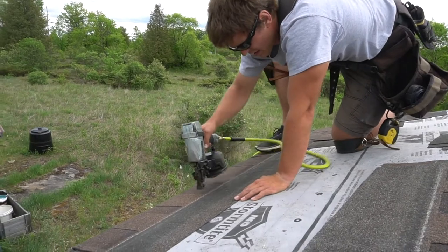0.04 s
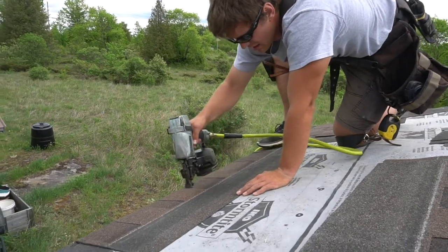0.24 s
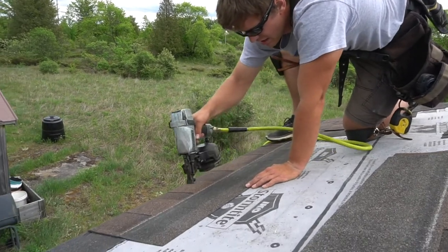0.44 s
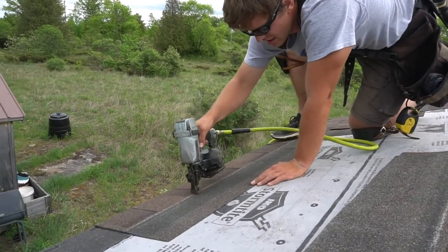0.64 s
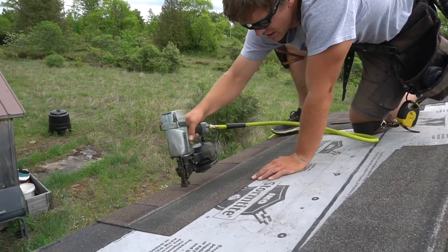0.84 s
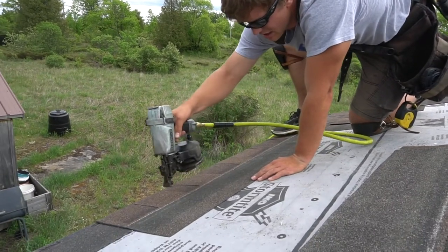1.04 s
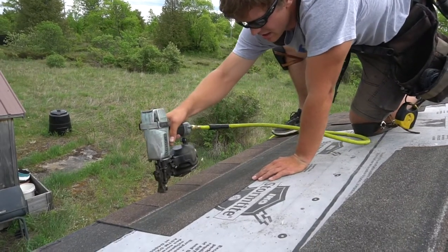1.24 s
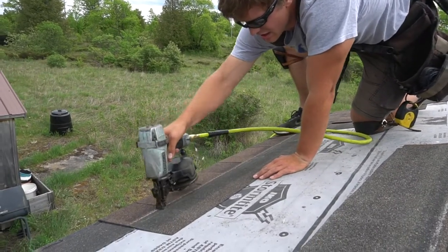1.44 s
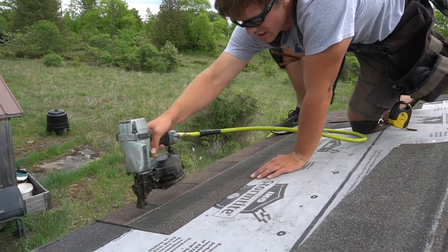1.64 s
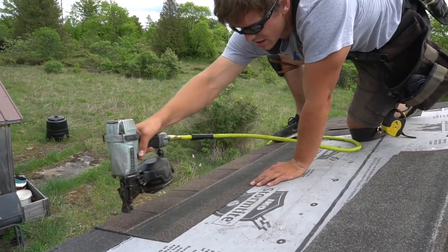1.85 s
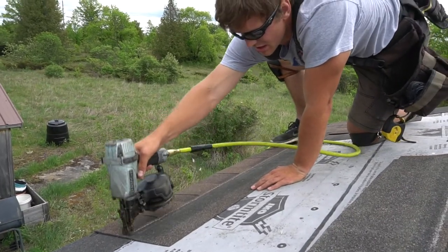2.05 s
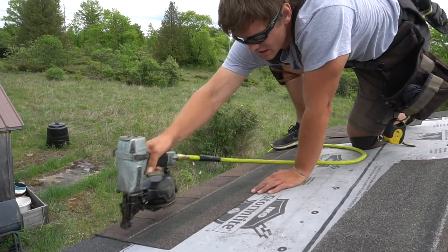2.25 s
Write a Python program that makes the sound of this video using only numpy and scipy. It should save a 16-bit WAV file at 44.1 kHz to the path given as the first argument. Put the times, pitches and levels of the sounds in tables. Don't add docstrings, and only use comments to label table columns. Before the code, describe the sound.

Pneumatic nail gun fires three loud, clipped shots on a windy roof, each venting whistling air

```python
import sys
import numpy as np
from scipy import signal
from scipy.fft import rfft, irfft
from scipy.io import wavfile
from scipy.ndimage import uniform_filter1d

SR = 44100
rng = np.random.default_rng(int(sys.argv[2]) if len(sys.argv) > 2 else 0)


def to_wav(sig):
    pcm = np.clip(np.atleast_2d(sig), -1, 1) * 32767
    pcm = np.round(pcm).astype(np.int16)
    wavfile.write(sys.argv[1], SR, pcm.T)


def nominal_scale(level):
    x = np.asarray(level, float) / 20
    return 10 ** x


N = 101297
LEAD_S = 0.25

# nose touch, driver clank, nail blow and piston return, all in seconds.
SHOT_TIMES = [
    (.7276, .7474, .7545, .7803),
    (1.5049, 1.5246, 1.5318, 1.5614),
    (2.1230, 2.1412, 2.1482, 2.1734),
]
EARLIER_RETURN_S, EARLIER_DB = -.028, 1

TOUCH_DB = [-11, -9, -18]
TOUCH_T60_S, TOUCH_HZ = 0.003, 1000
LUMP_DB, LUMP_HZ = -19, 500

# start in seconds, length in seconds, level in dB, whistle in Hz.
VALVE_SPURTS = [(.7315, .013, -19, 8600), (.7345, .004, -22, 13500), (1.5095, .0062, -19, 8300),
                (1.519, .005, -15, 8200), (2.1262, .004, -28, 8600), (2.1305, .003, -14, 13200),
                (2.133, .007, -21, 8600)]
# centre in seconds, level in dB, speed in Hz signed by direction.
PRESSURE_SURGES = [(.7327, -7, -220), (.7375, -11, 120), (.7435, -10, -250), (.7455, -10, 250),
                   (.7468, -8, -350), (1.5145, -13, -250), (1.516, -10, 400), (1.5238, -8, -450),
                   (2.1288, -14, -300), (2.1333, -9, -400), (2.136, -9, 90), (2.1403, -9, -220),
                   (2.157, 4, -350), (1.5385, 4, -450)]
# frequency in Hz, level in dB.
VALVE_AIR = [(200, 1.5), (1200, 0.5), (3000, 2), (6000, 5), (8700, -5.5), (10500, -1.5), (16000, 0.5)]
REED_HZ, REED_DB = 8550, -3

# frequency in Hz, level in dB, 60 dB decay in seconds.
CLANK_MODES = [(8500, -3, .007), (3100, -6, .006), (6600, -8, .006), (1800, -8, .006)]
CLANK_DB, CLANK_CRACK_DB = 7.5, -0.5
DRIVER_DB = [-18, -6, -3]
DRIVER_HZ, DRIVER_T60_S = 5050, .013

# frequency in Hz, level in dB, 60 dB decay in seconds.
BLOW_MODES = [(1500, 11.5, 0.013), (2200, 6, .012), (3550, 4, 0.0095)]
BLOW_PITCH = [.7, 0.97, 0.93]
BLOW_LAG_S, SQUEAK_DB = .0017, -9
BLOW_CRACK_DB, BLOW_CRACK_T60_S = 6, 0.031
PUSH_DB = [1.5, 1, 2.5]
PUSH_S = 0.01
# frequency in Hz, level in dB.
RATTLE_COLOUR = [(200, 4), (1200, -3.5), (3000, -4.5), (6000, -2), (8700, -3.5), (11000, -15), (16000, -12)]
RATTLE_DB, RATTLE_T60_S = -7, 0.091
# frequency in Hz, level in dB, 60 dB decay in seconds.
BOARD_MODES = [(824, 14.5, 0.02), (1513, 10.5, 0.015), (1502, 9.5, 0.015)]
# frequency in Hz, level in dB, 60 dB decay in seconds.
THUD_MODES = [(301.5, 0, 0.028), (94, -28, 0.092)]
THUD_DB = [10, 1.5, -3.5]
# frequency in Hz, level in dB, 60 dB decay in seconds.
DECK_MODES = [(71.5, -21.5, 0.72), (109, -20, 0.24), (188, -7, 0.21), (246, -28, .2), (343, -27, 0.099)]

SUCK_DB, SUCK_S = -2, 0.00131
HEAVE_DB = [-14, -14, -5]
HEAVE_S = .007
PUFF_DB, PUFF_S, PUFF_TAIL_DB, PUFF_T60_S = -14, .0172, -13, 0.28
STOP_DB, PAWL_S, PAWL_DB = -15, .0225, -11

# time after the piston return in seconds, level in dB.
VENT_CURVE = [(.015, -39), (.03, -27.5), (.05, -18), (.075, -16), (.11, -21), (.135, -26.5), (.175, -40),
              (.22, -50), (.4, -69)]
VENT_DB = [-0.5, 1, -1]
# frequency in Hz, level in dB.
JET_COLOUR = [(100, 7), (400, -1.5), (1200, -7.5), (2800, -14), (4870, -10), (8460, -13.5), (13000, -57),
              (16000, -46)]
# frequency in Hz, width in Hz, level in dB, share of pitch lost as pressure sags.
PORT_WHISTLES = [(4914, 380, -7.5, 0.22), (8490, 840, -8.5, 0.019), (4210, 340, -11.5, 0.16),
                 (12300, 1400, -15, 0.025), (13200, 700, -25, .01)]
ROAR_DB, ROAR_HZ, FLUTTER_DB = -11.5, 350, 1
DULLING_DB, DULL_HZ = -10.5, 6540

YARD_DB, YARD_T60_S, YARD_HZ = -22, 0.69, 1940

# time in seconds, level in dB.
SCUFF_CURVE = [(.07, -43), (.12, -28), (.165, -31), (.19, -26), (.21, -34), (.235, -28.5), (.258, -38),
               (.27, -44), (.33, -55)]
# start in seconds, level in dB, frequency in Hz.
DECK_KNOCKS = [
    (.159, -16, 253),
    (0.196, -17.5, 314),
    (0.24, -20.5, 295),
    (1.182, -27, 202),
]
# start in seconds, level in dB, frequency in Hz.
GRIT_TICKS = [(0.3965, -50, 7000), (0.517, -39, 7400), (0.537, -49.5, 2200), (.656, -42, 1640),
              (1.05, -33, 7900), (1.204, -39, 3700), (1.221, -45, 2400), (1.236, -42, 4000),
              (1.2433, -27.5, 2460), (1.253, -31, 2470), (1.2733, -29, 2470), (1.278, -37, 2400),
              (1.282, -35, 6000), (1.2825, -36, 2400), (1.2848, -22, 2470), (1.297, -43, 2400),
              (1.316, -39.5, 885), (1.491, -45, 1780), (1.75, -36, 6900), (1.768, -31, 7560),
              (1.8652, -37, 4150), (1.934, -42, 4930), (1.955, -43, 5500), (1.978, -29.5, 1980),
              (1.9783, -37.5, 1210), (1.9785, -31.5, 2470), (2.009, -34.5, 8250), (2.074, -38.5, 2040),
              (2.244, -12.5, 2380), (2.279, -11, 2500)]
TICK_CYCLES, TICK_SNAP = 19, 0.5
GRIT_PER_S, GRIT_DB = 120, -62
# time in seconds, level in dB.
RUSTLE_CURVE = [(0, -12), (.3, 5.5), (.7, 5), (1.0, 10), (1.25, 8), (1.4, 2), (1.8, 8.5), (2.1, 5.5),
                (2.3, 12)]

# frequency in Hz, level in dB.
AIR_COLOUR = [(60, 2), (110, -8.5), (220, -19), (1400, -24), (3000, -32), (9000, -37), (10200, -48),
              (16000, -46.5)]
AIR_DB = -47.5
# frequency in Hz, level in dB.
MOTOR_HUM = [(685, -56.5), (550, -68)]
HUM_FADE_DB_PER_S = -4
# time in seconds, level in dB.
WIND_CURVE = [(0, -39), (.08, -39), (.3, -35), (.7, -40), (.95, -30), (1.13, -30), (1.19, -22), (1.33, -23),
              (1.45, -28), (1.7, -36), (2.05, -33), (2.2, -24), (2.3, -27)]
# frequency in Hz, level in dB.
WIND_COLOUR = [(8, -5), (22, 2.5), (45, -4), (80, -9.5), (160, -23), (300, -39.5), (1000, -70)]
WIND_DB = -2
# centre in seconds, level in dB, speed in Hz signed by direction.
WIND_BUFFETS = [(1.048, -12, 14), (1.087, -16, -12), (1.173, -13, 30), (1.183, -13, -35), (1.24, -15, -16),
                (1.27, -8, -18), (1.309, -.3, 17), (1.342, -7, -11), (1.44, -10, 13), (1.472, -10, -14)]

RAIL, KNEE, COUPLING_HZ = 0.84, 4.5, 31
SQUEEZE, SQUEEZE_S = 1.26, 0.0045
PORT_RAIL, TOP, EDGE_HZ = .8, .97, 15900


def evened(x):
    return x / np.sqrt(np.mean(x ** 2) + 1e-20)


def add(mix, s, sound):
    at = round(s * SR)
    sound = sound[max(-at, 0):]
    part = mix[max(at, 0):][:len(sound)]
    part += sound[:len(part)]


def clock(length):
    return np.arange(round(length * SR)) / SR


def fade(db, t, t60):
    return nominal_scale(db - 60 * t / t60)


def noise(size):
    return rng.standard_normal(size)


def wander(size, width):
    return evened(uniform_filter1d(noise(size), size=width))


def coloured(points, size):
    f, level = np.transpose(points)
    hz = np.fft.rfftfreq(size, 1 / SR)
    shape = nominal_scale(np.interp(np.log(hz + 1), np.log(f + 1), level))
    return evened(irfft(rfft(noise(size)) * shape, size))


def resonate(x, hz, width):
    turn = np.exp(2j * np.pi * np.cumsum(hz * np.ones(len(x))) / SR)
    r = np.exp(-np.pi * width / SR)
    return 2 * (turn * signal.lfilter([1 - r], [1, -r], x / turn + 1e-18)).real


def ring(modes, t):
    return sum(fade(db, t, t60) * np.sin(2 * np.pi * hz * rng.uniform(0.96, 1.02) * t)
               for hz, db, t60 in modes)


def rumble(modes, t):
    return sum(fade(db, t, t60) * evened(resonate(noise(len(t)), hz, 5.8)) for hz, db, t60 in modes)


def curve(points, t):
    s, level = np.transpose(points)
    return nominal_scale(np.interp(t, s, level, left=level[0], right=level[-1]))


def gate(t, length, rise=.0012, fall=.001):
    return np.clip(t / rise, 0, 1) * np.clip((length - t) / fall, 0, 1)


def surges(table, t):
    return sum(np.sign(hz) * nominal_scale(db) * np.exp(-(4 * hz * (t - s)) ** 2) for s, db, hz in table)


def railed(x, rail, knee):
    return x / (1 + abs(x / rail) ** knee) ** (1 / knee)


def nail_blow(t, k):
    n = len(t)
    push = nominal_scale(PUSH_DB[k]) * np.minimum(t / 0.0019, 1) * np.exp(-t / PUSH_S)
    rattle = fade(RATTLE_DB, t, RATTLE_T60_S) * coloured(RATTLE_COLOUR, n)
    crack = coloured([(200, 1.5), (1400, 6), (2500, -2.0), (16000, -12.5)], n)
    crack *= fade(BLOW_CRACK_DB, t, BLOW_CRACK_T60_S)
    nail = ring(BLOW_MODES, t * BLOW_PITCH[k])
    thud = nominal_scale(THUD_DB[k]) * ring(THUD_MODES, t)
    board = ring(BOARD_MODES[k:][:1], t)
    deck = rumble(DECK_MODES, t) * np.minimum(t / 0.058, 1)
    return push + nail + thud + board + rattle + crack + deck


def driver_clank(t, k):
    metal = ring(CLANK_MODES + [(DRIVER_HZ, DRIVER_DB[k], DRIVER_T60_S)], t)
    crack = fade(CLANK_CRACK_DB, t, .007) * coloured([(500, -3), (9000, 0), (16000, -9)], len(t))
    return nominal_scale(CLANK_DB) * (metal + crack)


def nose_touch(t, k):
    scrape = 0.38 * coloured([(800, 13), (3000, 15), (16000, -40)], len(t))
    return fade(TOUCH_DB[k], t, TOUCH_T60_S) * (np.cos(2 * np.pi * TOUCH_HZ * t) + scrape)


def stroke(mix, touch, clank, blow, k):
    t = clock(1.0)
    n = len(t)
    add(mix, touch, nose_touch(t, k))
    lumps = evened(resonate(noise(n), LUMP_HZ, 650))
    add(mix, touch, nominal_scale(LUMP_DB) * lumps * gate(t, clank - touch, 0.002))
    add(mix, clank, driver_clank(t, k))
    add(mix, blow, nominal_scale(SQUEAK_DB) * coloured(VALVE_AIR, n) * gate(t, 0.003))
    add(mix, blow + BLOW_LAG_S, nail_blow(t, k))


def valve_hiss(size, reed_hz):
    air = coloured(VALVE_AIR, size)
    whistle = evened(resonate(noise(size), reed_hz, 770))
    return air + nominal_scale(REED_DB) * whistle


def valve_opening(mix):
    for s, length, db, hz in VALVE_SPURTS:
        t = clock(length)
        add(mix, s, nominal_scale(db) * valve_hiss(len(t), hz) * gate(t, length, .0006, .0015))
    add(mix, 0, surges(PRESSURE_SURGES, clock(N / SR)))


def piston_return(t, heave_db):
    suck = nominal_scale(SUCK_DB) * gate(t, SUCK_S, 0.00048, 0.00055)
    heave = nominal_scale(heave_db) * np.minimum(t / 0.00068, 1) * np.exp(-t / HEAVE_S)
    late = np.maximum(t - PUFF_S, 0)
    opening = gate(t, PUFF_S + 0.0016, 0.0004) + (late > 0) * fade(PUFF_TAIL_DB, late, PUFF_T60_S)
    puff = nominal_scale(PUFF_DB) * opening * valve_hiss(len(t), REED_HZ)
    stop = fade(STOP_DB, late, 0.029) * np.sin(2 * np.pi * 420 * late)
    pawl = (t > PAWL_S) * fade(PAWL_DB, t - PAWL_S, 0.0072) * coloured(RATTLE_COLOUR, len(t))
    return puff - suck - heave - stop + pawl


def port_jet(t):
    n = len(t)
    spent = np.clip((t - .085) / 0.042, 0, 1)
    white = noise(n)
    jet = coloured(JET_COLOUR, n)
    for hz, width, db, sag in PORT_WHISTLES:
        jet += nominal_scale(db) * evened(resonate(white, hz * (1 - sag * spent), width))
    treble = signal.sosfilt(signal.butter(2, DULL_HZ, "high", fs=SR, output="sos"), jet)
    low = signal.sosfilt(signal.butter(2, DULL_HZ, fs=SR, output="sos"), jet)
    jet = low - treble * nominal_scale(DULLING_DB * spent ** 2)
    roar = coloured([(60, -6), (ROAR_HZ, 0), (2000, -14), (16000, -50)], n)
    return evened(jet + nominal_scale(ROAR_DB) * roar)


def exhaust(mix, back, vent_db, heave_db):
    t = clock(0.23)
    piston = piston_return(t, heave_db)
    vent = nominal_scale(vent_db) * curve(VENT_CURVE, t) * port_jet(t)
    flutter = nominal_scale(FLUTTER_DB * wander(len(t), 150))
    add(mix, back, piston + vent * flutter)


def capsule(x):
    held = railed(x, RAIL, KNEE)
    r = np.exp(-1 / (SQUEEZE_S * SR))
    held = held / (1 + SQUEEZE * signal.lfilter([1 - r], [1, -r], held ** 2))
    return signal.lfilter([1, -1], [1, -np.exp(-2 * np.pi * COUPLING_HZ / SR)], held)


def yard(x):
    t = clock(.9)
    tail = coloured([(100, 0), (300, -2), (550, -12), (900, -6), (YARD_HZ, -3), (4000, -16),
                     (9000, -26), (16000, -50)], len(t))
    tail *= fade(0, t, YARD_T60_S) * np.clip(t / 0.018, 0, 1)
    return nominal_scale(YARD_DB) * signal.fftconvolve(x, tail / np.linalg.norm(tail))[:len(x)]


def shingle_scuff(t):
    grain = nominal_scale(2.2 * wander(N, 200))
    return curve(SCUFF_CURVE, t) * grain * coloured(
        [(100, 17.5), (1500, 0.5), (4500, -0.5), (8800, 1.0), (10500, -9.0), (16000, -9)], N)


def knocks_and_ticks():
    t, out = clock(0.078), np.zeros(N)
    for s, db, hz in DECK_KNOCKS:
        add(out, s, fade(db, t, 0.022) * np.sin(2 * np.pi * hz * t))
    for s, db, hz in GRIT_TICKS:
        snap = coloured([(hz / 5, -14), (hz / 2, -5), (hz, 0), (2 * hz, -8), (20000, -26)], len(t))
        snap *= TICK_SNAP * fade(0, t, 0.0084)
        tone = fade(0, t, TICK_CYCLES / hz) * np.sin(2 * np.pi * hz * t)
        add(out, s, nominal_scale(db) * (tone + snap))
    return out


def gear_grit(t):
    grains = (rng.random(N) < GRIT_PER_S / SR) * nominal_scale(GRIT_DB + 2.7 * np.minimum(rng.exponential(1, N), 2))
    bursts = signal.oaconvolve(grains, fade(0, clock(0.078), 0.0053))[:N]
    return bursts * curve(RUSTLE_CURVE, t) ** 1.97 * coloured(
        [(600, -24), (1500, 7), (5000, 5.0), (8800, 9.5), (12000, -10.0), (16000, 0)], N)


def outdoor_air(t):
    return nominal_scale(AIR_DB + 2.0 * wander(N, 600)) * coloured(AIR_COLOUR, N) * curve(RUSTLE_CURVE, t)


def motor_hum(t):
    return sum(nominal_scale(db + HUM_FADE_DB_PER_S * t)
               * (np.sin(2 * np.pi * hz * t) + 1.04 * evened(resonate(noise(N), hz, 11.0)))
               for hz, db in MOTOR_HUM)


def wind(t):
    return nominal_scale(WIND_DB) * curve(WIND_CURVE, t) * coloured(WIND_COLOUR, N) + surges(WIND_BUFFETS, t)


def scene():
    lead = round(LEAD_S * SR)
    gun = np.zeros(N + lead)
    exhaust(gun, EARLIER_RETURN_S + LEAD_S, EARLIER_DB, -60)
    for k, (touch, clank, blow, back) in enumerate(SHOT_TIMES):
        stroke(gun, touch + LEAD_S, clank + LEAD_S, blow + LEAD_S, k)
        exhaust(gun, back + LEAD_S, VENT_DB[k], HEAVE_DB[k])
    valve_opening(gun[lead:])
    gun = capsule(gun)
    nailer = (gun + yard(gun))[lead:]
    t = clock(N / SR)
    around = shingle_scuff(t) + knocks_and_ticks() + gear_grit(t)
    around += outdoor_air(t) + motor_hum(t) + wind(t)
    return (nailer + railed(around, PORT_RAIL, knee=15))[None]


def top_cut(x):
    return signal.sosfilt(signal.butter(12, 16550, fs=SR, output="sos"), x)


def record(dry):
    band = signal.firwin(255, EDGE_HZ, window=("kaiser", 8), fs=SR)
    mix = signal.oaconvolve(railed(dry, TOP, 8.), band[None], "same")
    return top_cut(mix)


dry = scene()
out = record(dry)
to_wav(out)
```